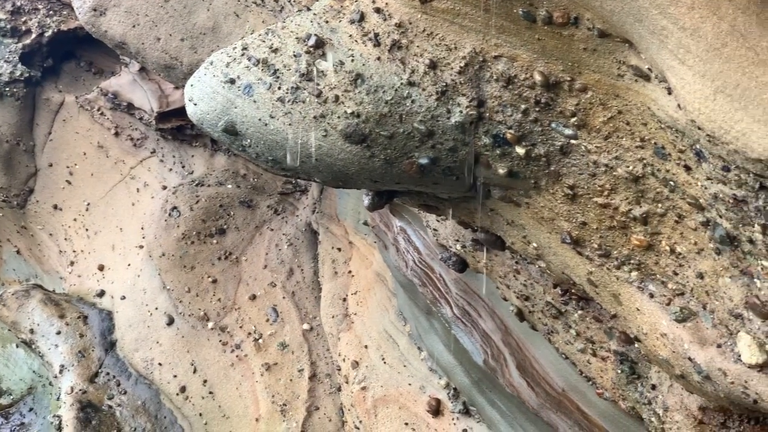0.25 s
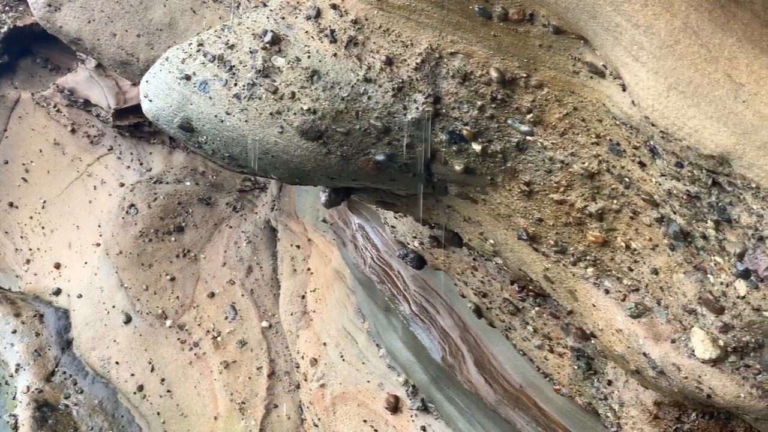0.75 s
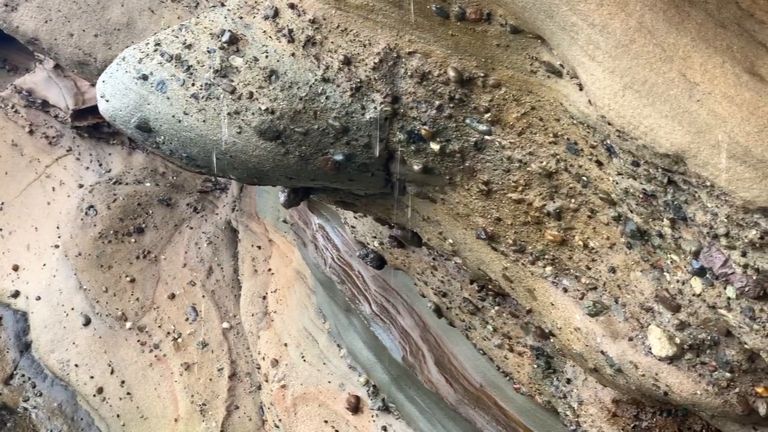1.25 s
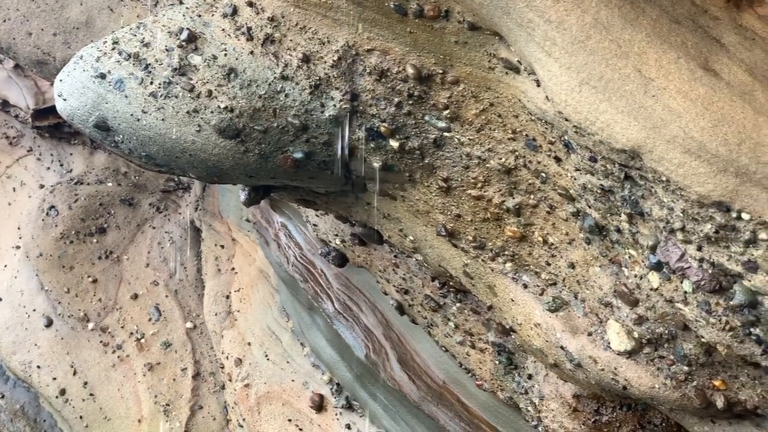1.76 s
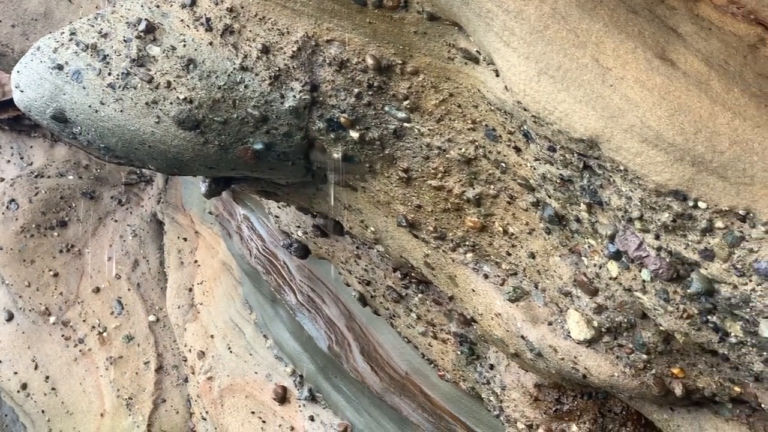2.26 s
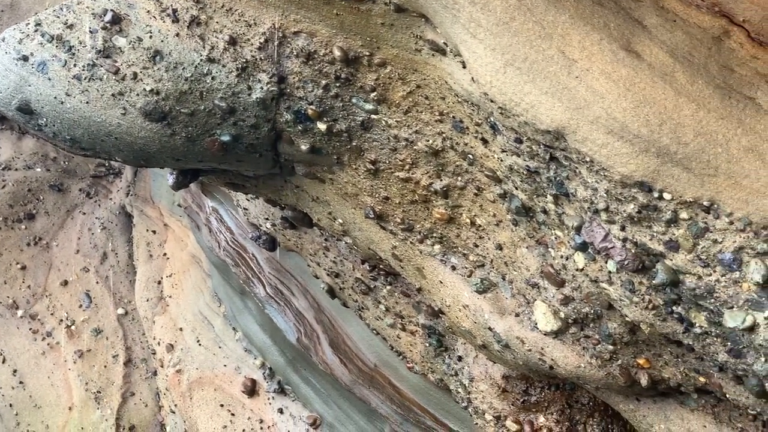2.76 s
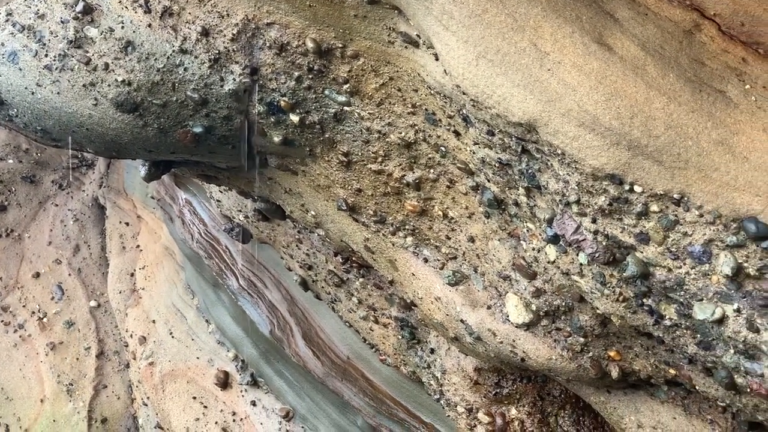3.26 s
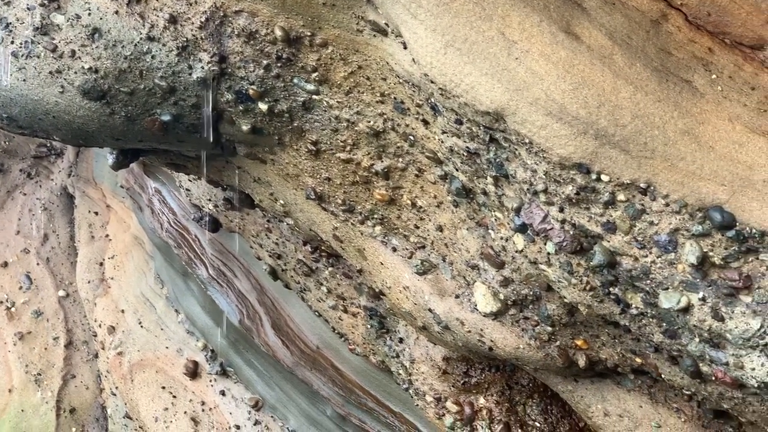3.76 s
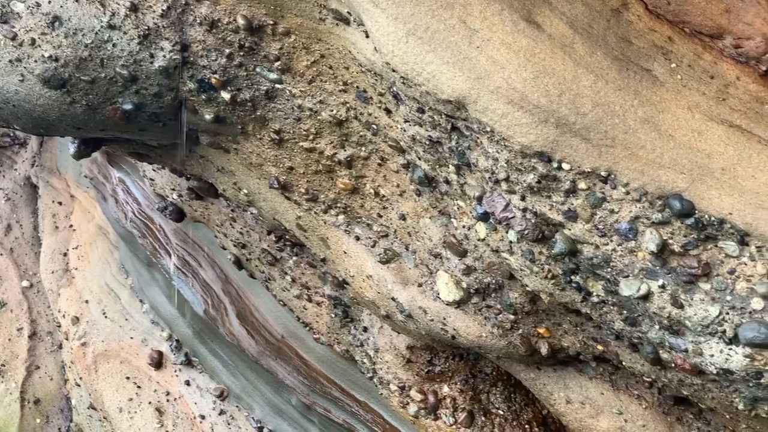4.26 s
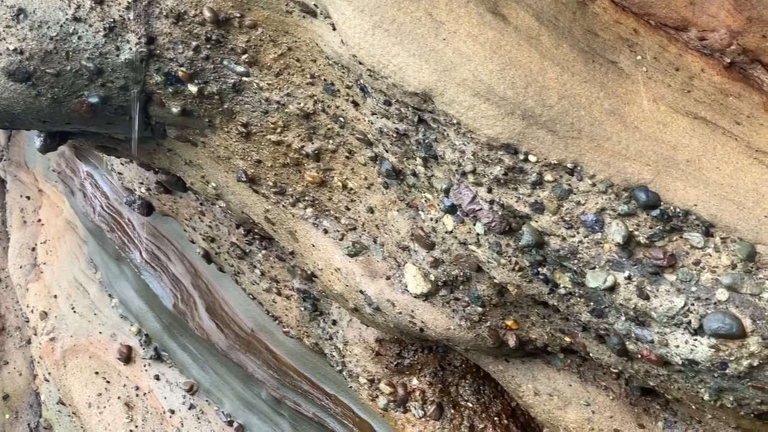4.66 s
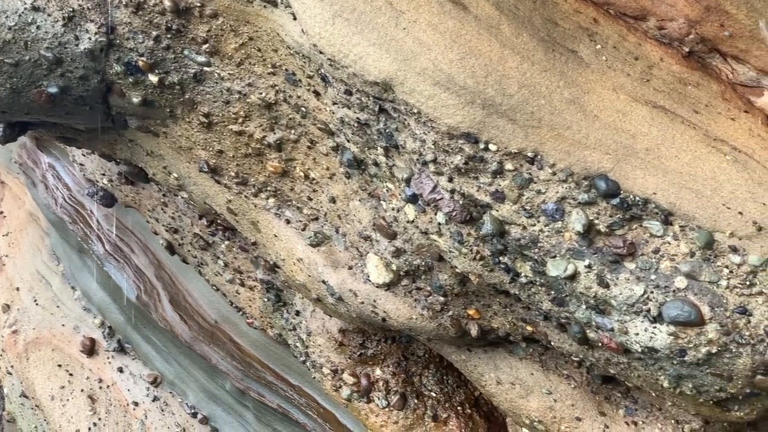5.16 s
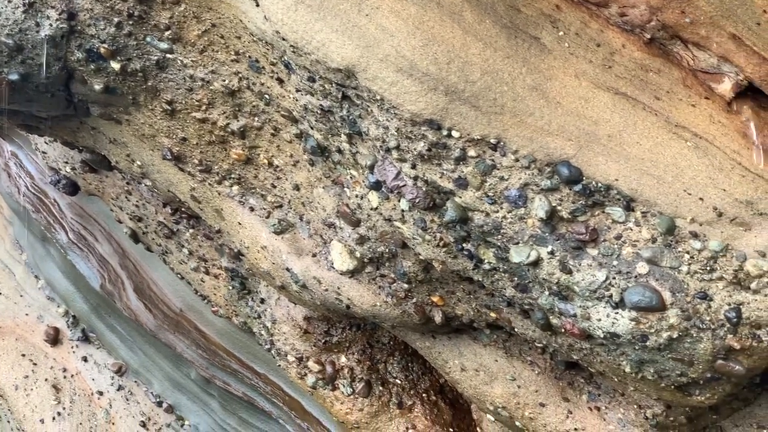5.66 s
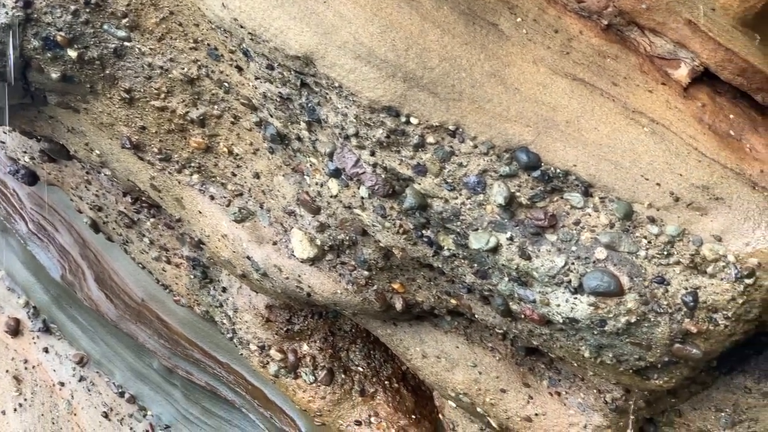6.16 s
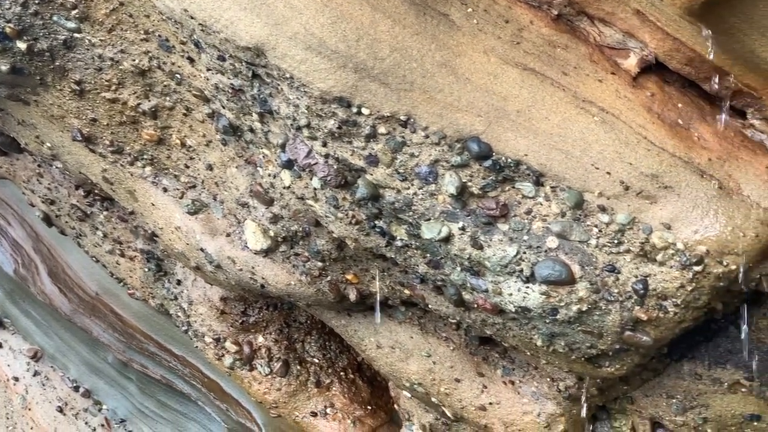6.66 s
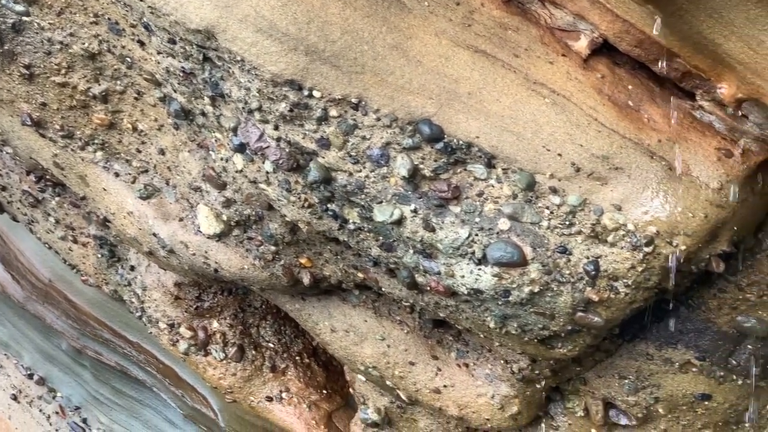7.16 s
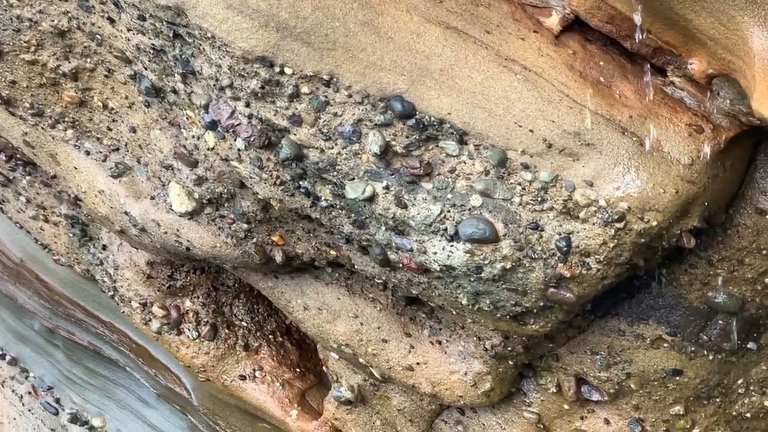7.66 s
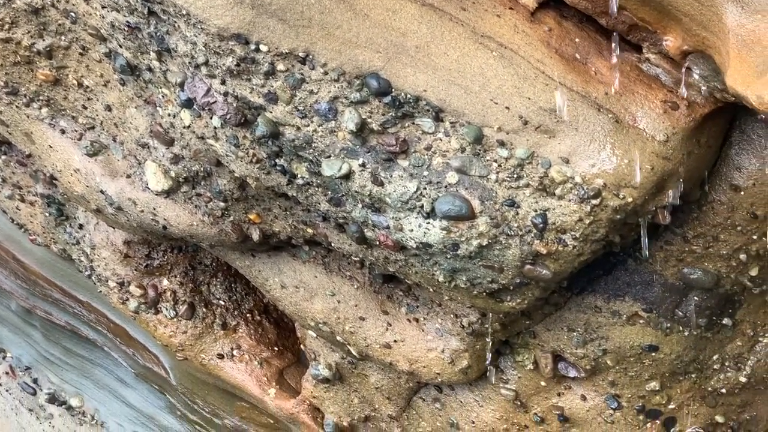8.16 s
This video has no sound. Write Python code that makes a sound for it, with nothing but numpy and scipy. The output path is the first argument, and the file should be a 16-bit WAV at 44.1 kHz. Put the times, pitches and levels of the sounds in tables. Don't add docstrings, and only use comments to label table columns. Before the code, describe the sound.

Drops from an overhang strike wet shore rock close to a handheld stereo microphone, around a dozen or more a second at irregular gaps. Heavy splats with a bright tick and short spray stand out among lighter ticks on bare stone, film and puddles. Some ring a tiny bubble. A fine treble-rich trickle runs throughout, with soft surf and low rumble far behind. Outdoors, dry, little echo.

```python
import sys
import numpy as np
from scipy import signal
from scipy.fft import rfft, irfft
from scipy.io import wavfile
from scipy.ndimage import uniform_filter1d

SR = 44100
rng = np.random.default_rng(int(sys.argv[2]) if len(sys.argv) > 2 else 0)


def dump_mix(stems):
    frames = np.atleast_2d(stems).T
    limited = np.clip(frames, -1, 1)
    pcm = np.round(limited * 32767).astype(np.int16)
    wavfile.write(sys.argv[1], SR, pcm)


def how_loud(loudness_db):
    steps = np.asarray(loudness_db, float) / 20
    return 10 ** steps


N = 371322

# t/s, fizz level/dB, fizz level above 12 kHz/dB, body level/dB, body f/Hz
SPLATS = [(0.0295, -30, -5, -31.5, 5930), (0.755, -24, -7.5, -31, 6700), (0.879, -26, -12, -33, 6100),
          (1.6129, -27, 3.5, -34, 4760), (1.8755, -35.5, -7, -29, 4300), (1.9367, -28.5, 5.5, -47, 5660),
          (1.9895, -34, 1.5, -43.5, 5260), (2.2708, -32, 0.5, -30, 4700), (2.7629, -30, -8, -33.5, 4900),
          (3.4636, -24.5, -9, -30, 6600), (3.5204, -32.5, 1, -37, 4700), (4.7206, -32, 1, -27, 7000),
          (5.0932, -28.5, -10.5, -34, 6170), (5.2095, -31.5, -5, -30, 6360), (5.4903, -30.5, 1, -33, 6500),
          (5.672, -30, -11, -30.5, 4700), (5.9413, -25.5, 1.5, -40, 6300), (6.0955, -32.5, -9.5, -45, 5190),
          (6.5058, -32.5, -4, -38, 4800), (6.9562, -34, 0, -37, 5600), (7.5992, -34.5, -9, -32.5, 3700),
          (7.873, -30, -1, -31.5, 5050), (8.033, -28.5, -7, -34, 2900), (8.1058, -36, -8, -36.5, 6700)]
# t/s, fizz level/dB, fizz top level/dB
ON_ROCK = [(0.3146, -49, 12), (0.9603, -33, 0.5), (1.123, -54, 7), (1.2164, -48, 4), (1.2352, -35.5, 4),
           (1.5332, -51, 9), (2.4067, -34.5, 1.1), (2.827, -42.5, -2), (2.858, -45, 7.5), (3.106, -45, -11),
           (3.6178, -40, -16), (3.858, -41.5, 9.5), (4.193, -41, 6), (4.4708, -38.5, 0.5),
           (4.6454, -56, 15), (4.9411, -49, 4), (5.292, -44, 1.5), (5.6, -38, 2.1), (5.6164, -39, 3),
           (5.9244, -38, 4), (6.4886, -41, -1.1), (6.8524, -37, 3), (7.0955, -34.5, -7), (7.294, -45.5, -5),
           (7.42, -44.5, 6), (7.706, -35.5, 0), (7.9148, -33.5, -6), (8.3428, -43, 4)]
# t/s, fizz level/dB, fizz top level/dB, body level/dB
ON_FILM = [(0.2335, -35, -2, -41), (0.341, -39.5, -5, -46), (0.5132, -38, -1, -42), (0.5893, -44, -3, -42),
           (0.6145, -39, -2, -37), (0.7963, -41, 3, -33), (1.0303, -45, 3, -38.5), (2.258, -41.5, 0, -37.5),
           (2.317, -43.5, 8.5, -43), (2.4452, -43, 1, -39.5), (2.6195, -43, 0, -38.5),
           (2.7498, -40, -8, -39.5), (3.3128, -50, -2, -38), (3.9107, -37.5, -2, -45),
           (3.9415, -37, -1, -36), (4.0927, -33, -0.5, -36), (4.9116, -41.5, 3, -38.5),
           (5.0682, -43, -13, -46), (5.137, -39, -2, -43), (5.3743, -45, -19, -45), (5.7282, -41, 2, -47.5),
           (6.068, -57, -2, -40), (6.3783, -40, -6.5, -42), (6.419, -41, -2, -44), (6.7408, -37, -20, -36),
           (7.08, -40, -4, -40), (0.149, -42, -8, -54), (2.137, -55, 1, -44), (0.406, -50.5, -2, -47)]
# t/s, fizz level/dB, body level/dB, body f/Hz
IN_PUDDLE = [(0.247, -52, -43, 4440), (0.26, -34.5, -38, 4300), (0.533, -39, -45.5, 3860),
             (1.3046, -45, -47, 4170), (1.4212, -39, -43.5, 4500), (1.6863, -38.5, -37, 4700),
             (2.382, -38, -41, 5250), (3.4461, -37.5, -42.5, 4100), (4.1322, -36.5, -39.5, 4500),
             (4.4048, -42.5, -45.5, 3540), (4.9766, -35, -34, 5000), (5.341, -43, -57, 3850),
             (5.427, -64, -42.5, 4060), (5.436, -41, -40.5, 5270), (5.8183, -43.5, -41, 3980),
             (6.177, -43.5, -45.5, 4140), (6.3934, -51, -43, 5460), (6.468, -38.5, -40, 3540),
             (6.902, -64, -46, 5260), (7.3518, -41.5, -39, 3170), (7.4906, -43, -46, 4650),
             (7.589, -46, -42, 3600), (7.7844, -51, -41.5, 4730), (8.167, -65, -45, 4480)]
# t/s, fizz level/dB, body level/dB, body f/Hz
STRANDS = [(0.6429, -33, -40.5, 6500), (1.47, -60, -42, 5770), (1.514, -48, -49.5, 5030),
           (2.5962, -47, -57, 5560), (2.9358, -40.5, -45, 7000), (3.038, -47, -58, 6590),
           (3.237, -36.5, -34, 5800), (3.684, -41, -42, 5640), (3.9665, -36.5, -40.5, 4230),
           (4.567, -36.5, -50, 6630), (5.6666, -46, -44, 3000), (6.56, -43, -60, 4570),
           (7.68, -34.5, -38.5, 6100)]
# t/s, fizz level/dB
DROPLETS = [(1.4572, -41), (1.595, -41), (0.0032, -35), (1.8571, -43), (2.0533, -41.5), (2.0917, -44),
            (3.4147, -45), (3.5675, -45), (3.9874, -38.5), (4.5512, -45.5), (4.802, -56), (4.8367, -45),
            (6.3348, -41), (6.836, -46), (7.178, -43), (8.3035, -41.5)]
# t/s, peak level/dB, f/Hz
SLAPS = [(0.0297, -38.5, 2300), (0.7547, -42, 2600), (0.8776, -42, 2830), (1.611, -56, 2710),
         (1.685, -49.5, 2580), (1.875, -32, 2800), (1.988, -46, 2320), (2.2681, -37, 2390),
         (2.76, -42, 2600), (4.7206, -33, 2800), (5.0915, -41.5, 3030), (5.4883, -42.5, 2570),
         (5.67, -37.5, 2730), (5.94, -47.5, 2420), (7.596, -59, 1950), (7.866, -34, 3630),
         (4.7294, -33.5, 3300), (5.083, -40.5, 3300), (8.0317, -29.5, 2620),
         (1.3046, -33, 4300),
]
# t/s, peak level/dB, f/Hz
PIPS = [(0.0378, -31.5, 1900), (0.2334, -46, 3300), (0.3444, -49, 2500), (0.7602, -38, 3300),
        (1.0413, -49, 1900), (1.405, -46, 3300), (1.937, -51, 2500), (2.0106, -46, 1900),
        (2.272, -41, 1900), (2.6327, -44, 1400), (2.854, -45, 1400), (3.0562, -46, 3300),
        (3.464, -51, 1400), (3.5142, -51, 1900), (3.6169, -48, 1400), (4.2348, -47, 1410),
        (4.4049, -48, 2500), (4.471, -49, 3300), (4.8392, -54, 1900), (4.912, -47, 2500),
        (5.047, -49, 3300), (5.138, -43, 3300), (5.6002, -49, 2500), (5.658, -28.5, 3300),
        (5.9412, -41, 2500), (6.1472, -48, 1400), (6.469, -45, 2500), (6.5066, -43, 2500),
        (7.3575, -33, 3300), (7.7169, -44, 1900), (7.866, -32, 2510), (8.0335, -22.5, 2500),
        (8.099, -43, 1400),
        (0.0034, -37, 4300), (0.0394, -29, 5700), (0.2478, -34, 7500), (0.2601, -31, 5700),
            (0.3252, -45, 5700), (0.357, -39, 4300), (0.5469, -36, 7500), (0.5786, -41, 5700),
            (0.615, -36, 4300), (0.7966, -32, 4300), (0.851, -42, 7500), (0.9834, -36, 5700),
            (1.0308, -40, 4300), (1.307, -26, 4330), (1.4228, -36, 4300), (1.4713, -40, 4300),
            (1.5145, -40, 4300), (1.623, -33, 5700), (1.8767, -22, 4300), (1.9899, -41, 4300),
            (2.0433, -39, 7500), (2.3832, -36, 4300), (2.4451, -38, 4300), (2.6205, -35, 7500),
            (2.7657, -32, 4300), (2.7814, -33, 4300), (3.1365, -44, 4300), (3.1739, -45, 4300),
            (3.2415, -39, 4300), (3.4416, -38, 4300), (3.4656, -30.5, 4300), (3.5209, -33, 4300),
            (3.6863, -45, 4300), (3.8813, -37, 7500), (3.911, -34, 7500), (3.941, -36, 4300),
            (4.1334, -35, 4300), (4.243, -45, 4300), (4.7209, -21.5, 7500), (4.7294, -26, 4300),
            (4.9778, -28.5, 4300), (5.2013, -34, 4300), (5.2108, -35, 4300), (5.2734, -47, 4300),
            (5.3423, -45, 4300), (5.3749, -46, 4300), (5.4367, -26.5, 5650), (5.4896, -27, 4300),
            (5.6727, -31, 4300), (5.8204, -29, 4280), (6.0132, -51, 4300), (6.1781, -34.5, 7500),
            (6.2689, -43, 4300), (6.3796, -32, 7500), (6.397, -39, 5700), (6.4693, -31, 7500),
            (6.6987, -36, 7500), (6.7433, -30.5, 5650), (7.2517, -43, 7500), (7.4914, -34, 4300),
        (0.2862, -36, 13500), (0.644, -27, 13500), (0.6734, -32, 13500), (0.7966, -29, 13500),
             (1.1937, -38, 13500), (1.5329, -39, 9800), (1.6881, -33.5, 13500), (1.944, -24, 13500),
             (2.1238, -35, 13500), (2.8265, -29, 9800), (2.9684, -34, 9800), (2.9751, -33, 13500),
             (3.1996, -34, 13500), (3.8589, -33, 9800), (4.2655, -39, 13500), (4.9407, -29, 13500),
             (5.024, -36, 13500), (5.908, -39, 9800), (5.9418, -22, 13500), (6.7603, -46, 13500),
             (6.8523, -27, 13500), (7.4914, -34, 13500), (7.5632, -47, 13500),
        (7.6809, -34, 5700),
    (7.7865, -36, 5700),
    (7.8663, -28, 7500),
    (8.0401, -32, 4300),
    (8.1065, -28, 7500),
]
# t/s, peak level/dB, f/Hz, t60/s
BUBBLES = [(0.0444, -45, 2250, 0.087), (1.1867, -50, 1700, 0.06), (2.566, -52, 1750, 0.054),
           (3.1474, -47.5, 1476, 0.11), (3.6126, -52, 1160, 0.041), (4.2174, -46, 1590, 0.091),
           (4.462, -42.5, 2030, 0.055), (6, -57.5, 1600, 0.06), (8.8, -46, 1920, 0.034),
           (8.6, -47, 1850, 0.059), (0.15, -45, 8600, .15), (1.906, -40, 8700, 0.076),
           (1.879, -32, 3600, .06), (5.654, -30, 4400, 0.035), (5.641, -39, 3500, .025),
           (7.1, -31, 4300, .04), (0.44, -44, 3900, 0.022), (.038, -25, 4300, 0.035),
           (1.049, -37, 4000, 0.038), (5.4355, -36, 3950, 0.034), (5.8197, -37, 3700, .03),
           (5.4, -51, 2000, 0.033), (.26, -26, 4330, 0.032), (7.598, -34, 3440, .03),
           (2.458, -48, 2400, .05), (7.066, -45, 4340, .03)]
# t/s, length/s, f/Hz, level/dB
GROANS = [(1.03, 0.097, 255, -60), (2.86, 0.081, 225, -55.5), (2.33, 0.082, 91, -52), (0.91, 0.17, 88, -58),
          (8.098, 0.042, 180, -51), (2.46, .07, 90, -54), (6.185, .05, 74, -53.5), (6.15, 0.032, 183, -57),
          (1.9, 0.037, 430, -61), (2.86, .05, 530, -66), (8.11, 0.028, 81, -54), (4.72, 0.07, 80, -61),
          (.12, .1, 190, -64)]
# t/s, peak level/dB, f/Hz
KNOCKS = [(0.089, -52, 486), (0.183, -42.5, 450), (0.993, -56, 636), (2.182, -55, 424), (2.256, -54.5, 842),
          (2.316, -48, 264), (2.459, -42.5, 450), (2.629, -48.5, 474), (2.849, -44.5, 560),
          (5.261, -50, 990), (5.483, -57, 154), (6.14, -42.5, 627), (7.291, -58, 178), (8.094, -42.5, 950)]
# f/Hz, level/dB
KNOCK_SPECTRUM = [(80, -3.5), (200, -1.5), (500, -3.5), (1200, -10.5), (2400, -14.5), (5000, -29)]
# t/s, length/s, level/dB
SURGES = [
    (6.78, .22, -59.5),
    (7.28, .24, -63),
    (7.58, 0.27, -62),
    (1.6, 0.14, -66),
    (1.94, 0.086, -61.5),
    (5.8, 0.12, -70),
    (4.8, .12, -69),
]
# t/s, trickle level/dB, surf level/dB
FLOW = [
    (0.0, -48, -66),
    (1.01, -48.5, -74.5),
    (1.73, -54.5, -70),
    (2.01, -50.5, -71.5),
    (6.78, -48.5, -74.5),
    (7.34, -52.5, -73.5),
    (7.53, -49, -68),
    (8.42, -49.5, -67.5),
]
# f/Hz, level/dB
PATTER_SPECTRUM = [(800, -28), (1800, -9.5), (3000, -10.5), (5000, -11), (7300, -4), (9500, -3),
                   (11700, 0.5), (14000, -2.5), (15700, -0.5), (16900, -26)]
# f/Hz, level/dB
WASH_SPECTRUM = [(150, 5), (300, 0.5), (500, -1.5), (1000, -3), (1800, -5.5), (3000, -6.5), (6000, -1.5)]
# f/Hz, level/dB
RUMBLE_SPECTRUM = [(20, -53), (31, -9), (49, -0.5), (80, 2), (100, -4), (150, -14), (300, -20.5),
                   (600, -90)]
# f/Hz, share
PORT_LIKENESS = [(60, .99), (170, .8), (450, .3), (3000, .32), (6200, .25), (7300, .72), (8500, .89),
                 (11700, .99), (16000, .86)]
# f/Hz, phase/rad
PORT_LEAD = [(95, 0), (190, .3), (500, 1.8), (1200, .3), (1900, 1), (2250, 3.6), (3200, 7.4), (4600, 7.2),
             (5300, 10.7), (6000, 12.4), (7300, 12.57)]

PORT_LAG_S = 0.0002152
LEAD_IN_S = .002
ROCK_BODY_DB, ROCK_HZ = -18, 5800


def evened(x):
    return x / np.sqrt(np.mean(x ** 2) + 1e-20)


def read(points, hz):
    f, value = np.transpose(points)
    return np.interp(np.log(hz + 1), np.log(f + 1), value)


def colour(x, points):
    size = x.shape[-1]
    return irfft(rfft(x) * how_loud(read(points, np.fft.rfftfreq(size, 1 / SR))), size)


def flicker(shape, span, depth_db):
    return how_loud(depth_db * evened(uniform_filter1d(rng.standard_normal(shape), span)))


def lumpy(x, span, depth_db):
    spectrum = rfft(x)
    return irfft(spectrum * flicker(spectrum.shape[-1], span, depth_db), x.shape[-1])


def patchy(x, depth_db, frames=5, bins=9):
    z = signal.stft(x, nperseg=256)[2]
    field = uniform_filter1d(rng.standard_normal(z.shape[1:]), bins, axis=0)
    field = uniform_filter1d(field, frames, axis=1)
    return signal.istft(z * how_loud(depth_db * evened(field)), nperseg=256)[1][:, :N]


def add(mix, s, sound):
    part = mix[:, max(round(s * SR), 0):][:, :sound.shape[1]]
    part += sound[:, :part.shape[1]]


def hit_time(size):
    return np.maximum(np.arange(size) / SR - LEAD_IN_S, 0)


def aimed(pair, s, reach=24, direct=.8):
    shift = round(s * SR) % (2 * reach) - reach
    second = direct * np.roll(pair[0], shift) + np.sqrt(1 - direct ** 2) * pair[1]
    return np.array([pair[0], second])


def fizz(spray_db, spray_t60=0.064, tail_db=-11, tail_t60=0.22):
    size = 4096
    t = hit_time(size)
    noise = rng.standard_normal((2, size))
    tick = evened((t > 0) * np.exp(-t / 1.1e-4) * noise) * .95 / np.sqrt(size / 30)
    spray = flicker(size, 50, 3) * how_loud(-60 * t / spray_t60)
    spray = spray + how_loud(tail_db - 60 * t / tail_t60)
    onset = 1 - np.exp(-t / 0.00039)
    fade = np.hanning(2 * size)[size:]
    return tick + how_loud(spray_db) * spray * onset * fade * noise


def body(hz, rise_s=0.0017, t60=0.095, ring_db=8, width=1.36, snap=3.13):
    size = 4096
    t = hit_time(size)
    swell = flicker(size, 70, 3.5) * how_loud(-60 * t / t60) * (1 - np.exp(-t / rise_s))
    shape = snap * (t > 0) * np.exp(-t / 0.0003) + swell
    slap = colour(shape * rng.standard_normal((2, size)),
                  [(hz / 3.26, -24), (hz / width, .1), (hz, ring_db), (hz * width, .5),
                   (hz * 1.83, -8), (hz * 3.4, -24)])
    slap = lumpy(slap, 22, 3.5)
    return slap / slap[:, 80:480].std()


def drop(fizz_db, top_db, body_db, hz, spray_db):
    bright = colour(fizz(spray_db), [(1500, -31), (5000, -19.5), (7000, -4), (9500, -0.8),
                                     (10800, 0.2), (13500, top_db), (17000, top_db - 8.0)])
    bright /= bright[:, 80:480].std()
    return how_loud(fizz_db + max(top_db, 0) - 1.0) * bright + how_loud(body_db - 1.0) * body(hz)


def drops():
    out, lead_s = np.zeros((2, N)), .0016
    # t/s, fizz/dB, top/dB, body/dB, f/Hz, spray/dB
    hits = [(s, db, top_db, body_db, hz, -13) for s, db, top_db, body_db, hz in SPLATS]
    hits += [(s, db, top_db, db + ROCK_BODY_DB, ROCK_HZ, -11.5) for s, db, top_db in ON_ROCK]
    hits += [(s, db, top_db, body_db, 6300, -13) for s, db, top_db, body_db in ON_FILM]
    hits += [(s, db, -3.5, body_db, hz, -10.5) for s, db, body_db, hz in IN_PUDDLE]
    hits += [(s, db, -1.5, body_db, hz, 4.5) for s, db, body_db, hz in STRANDS]
    hits += [(s, db, -2.1, db + ROCK_BODY_DB, ROCK_HZ, -8) for s, db in DROPLETS]
    for s, *kind in hits:
        add(out, s - lead_s, aimed(drop(*kind), s))
    for s, db, hz in SLAPS:
        slap = body(hz, ring_db=7, t60=0.062)
        add(out, s - lead_s, how_loud(db - 2.5) * aimed(slap, s))
    return out


def pips(click_s=0.00048, tail_db=-14, tail_t60=0.054, width=1.265, trim_db=-5.0):
    out, t = np.zeros((2, N)), hit_time(2048)
    shape = (t > 0) * (np.exp(-t / click_s) + how_loud(tail_db - 60 * t / tail_t60))
    for s, db, hz in PIPS:
        burst = colour(shape * rng.standard_normal((2, len(t))),
                       [(hz / width ** 2, -24), (hz / width, -6), (hz, 0),
                        (hz * width, -6), (hz * width ** 2, -24)])
        burst /= burst[:, 80:150].std(axis=1, keepdims=True)
        add(out, s - LEAD_IN_S, how_loud(db + trim_db) * aimed(burst, s))
    return out


def bubbles(glide_per_s=0.26, wobble=0.37):
    out, t = np.zeros((2, N)), np.arange(6000) / SR
    for s, db, hz, t60 in BUBBLES:
        ring = np.sin(2 * np.pi * hz * (t + glide_per_s * t ** 2))
        ring *= how_loud(db + 1.0 - 60 * t / t60) * (1 - np.exp(-t / 0.0014))
        uneven = evened(uniform_filter1d(rng.standard_normal((2, len(t))), 60))
        add(out, s, ring * (1 + wobble * uneven))
    return out


def groans():
    out = np.zeros((2, N))
    for s, length_s, hz, db in GROANS:
        t = np.arange(round(length_s * SR)) / SR
        swell = how_loud(db + 5.0) * np.sin(2 * np.pi * hz * t) * np.sin(np.pi * t / length_s)
        add(out, s, swell * flicker((2, 12000), 200, 2.5)[:, :len(t)])
    return out


def knocks(t60=0.19):
    out, t = np.zeros((2, N)), np.arange(8192) / SR
    for s, db, hz in KNOCKS:
        puff = rng.standard_normal((2, len(t))) * how_loud(-60 * t / t60) * (1 - np.exp(-t / 0.0059))
        puff = colour(puff * flicker(len(t), 300, 3.7), KNOCK_SPECTRUM)
        puff = colour(puff, [(hz * 0.83, 0), (hz, 9), (hz * 1.18, 0)])
        puff = lumpy(puff, 18, 3)
        add(out, s, how_loud(db - 4.5) * puff / puff[:, :900].std())
    return out


def surges():
    out = np.zeros((2, N))
    for s, length_s, db in SURGES:
        size = round(length_s * SR)
        noise = colour(rng.standard_normal((2, 16384)),
                       [(120, -7.5), (400, -1), (1000, -7.5), (1700, -10.0), (4000, -38)])
        noise = evened(lumpy(noise, 40, 3) * flicker(16384, 200, 2.5))
        add(out, s, how_loud(db + 4.5) * np.hanning(size) * noise[:, :size])
    return out


def flow(column):
    rows = np.transpose(FLOW)
    return how_loud(np.interp(np.arange(N) / SR, rows[0], rows[column]))


def patter(per_s=220, spread_db=12.5, bed_db=-8):
    out = np.zeros((2, N))
    for hz in np.geomspace(2500, 14500, num=10):
        loudness_db = spread_db * np.minimum(rng.exponential(1, N), 1.7)
        train = (rng.random(N) < per_s / 10 / SR) * how_loud(loudness_db)
        grain = colour(fizz(6.5), [(hz / 1.83, -12), (hz, .1), (hz * 1.78, -12)])
        out += signal.oaconvolve(train[None], grain / np.sqrt(hz), axes=1)[:, :N]
    out = colour(out, [(2000, -3.0), (14000, 1.0)])
    hiss = patchy(rng.standard_normal((2, N)) * flicker(N, 900, 3.7), 5.7)
    return flow(1) * evened(colour(evened(out) + how_loud(bed_db) * hiss, PATTER_SPECTRUM))


def shore(rumble_db=-42, rumble_follows=.25):
    surf = flow(2)
    wash = evened(colour(rng.standard_normal((2, N)), [(40, -25)] + WASH_SPECTRUM + [(12000, -38)]))
    wash = how_loud(5.0) * flicker(N, 2000, 3.9) * patchy(wash, 1.4, frames=14, bins=3)
    rumble = evened(colour(rng.standard_normal((2, N)), RUMBLE_SPECTRUM))
    rumble *= how_loud(rumble_db) * surf ** rumble_follows
    return surf * wash + flicker(N, 3000, 2.8) * rumble


def ports(pair):
    hz = np.fft.rfftfreq(N, 1 / SR)
    same = np.clip(read(PORT_LIKENESS, hz), 0, 1)
    right, scatter = rfft(pair)
    turn = np.exp(1j * read(PORT_LEAD, hz) - 2j * np.pi * hz * PORT_LAG_S)
    left = same * right * turn + np.sqrt(1 - same ** 2) * scatter
    left *= how_loud(read([(500, -.6), (4000, -2.1), (8500, 0)], hz))
    return irfft(np.array([left, right]), N)


def scene():
    near = drops() + pips() + bubbles() + groans() + knocks()
    return ports(near + surges() + patter() + shore())


def starved(x, share_pct=13, cut_db=-40, top_hz=15750, sharp_pct=90):
    mid_side = np.array([x[0] + x[1], x[0] - x[1]]) / 2
    hz, _, z = signal.stft(mid_side, SR, nperseg=512)
    band, block = np.arange(z.shape[1]) // 3, np.arange(z.shape[2]) // 4
    power = np.add.reduceat(abs(z) ** 2, np.arange(0, len(band), 3), 1)
    power = np.add.reduceat(power, np.arange(0, len(block), 4), 2)
    masking = np.sqrt(power * np.median(power, axis=2, keepdims=True))
    ratio = power / uniform_filter1d(masking, size=15, axis=1)
    weak = ratio < np.percentile(ratio[:, 10:60], share_pct)
    weak = weak[:, band][:, :, block] & (hz > 2500)[:, None]
    top = power[:, 54:61].sum(axis=(0, 1))
    rise = top / np.roll(top, 1)
    not_sharp = (rise < np.percentile(rise, sharp_pct))[block]
    weak = np.where((hz > top_hz)[:, None], not_sharp, weak)
    mid, side = signal.istft(np.where(weak, how_loud(cut_db) * z, z), nperseg=512)[1][:, :N]
    return np.array([mid + side, mid - side])


def roll_off(x):
    return signal.sosfilt(signal.butter(12, 16970, fs=SR, output="sos"), x)


def record(dry):
    taps = signal.firwin(255, 16480, window=("kaiser", 8), fs=SR)
    mix = signal.oaconvolve(starved(dry), taps[None], "same")
    return roll_off(mix)


dry = scene()
out = record(dry)
dump_mix(out)
```